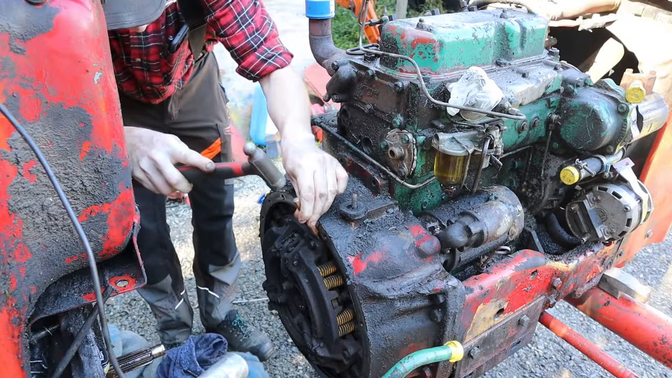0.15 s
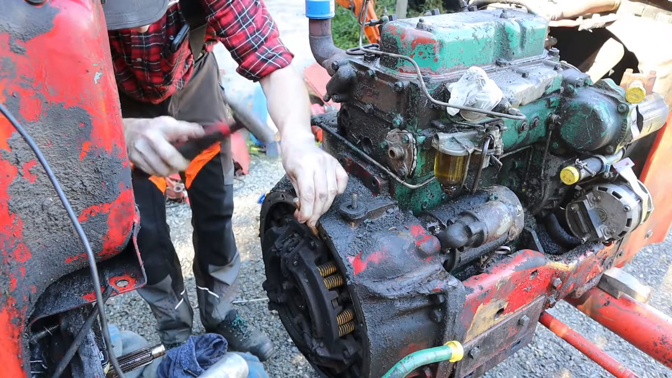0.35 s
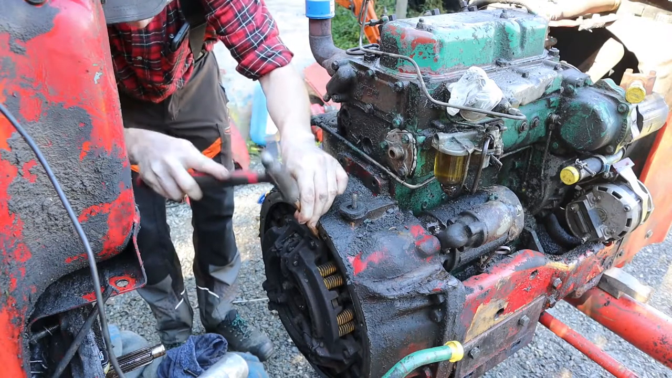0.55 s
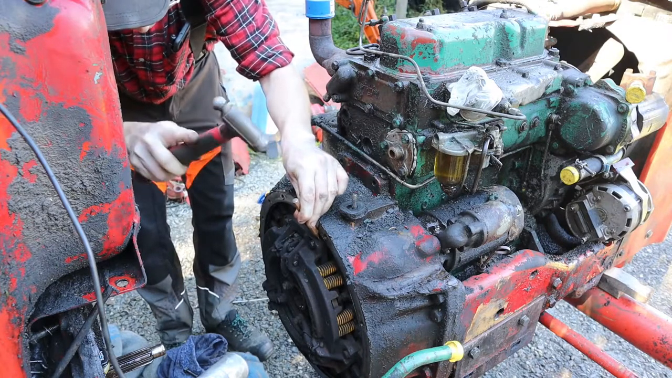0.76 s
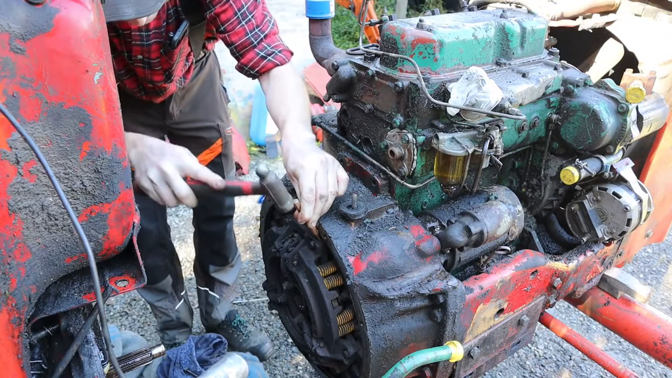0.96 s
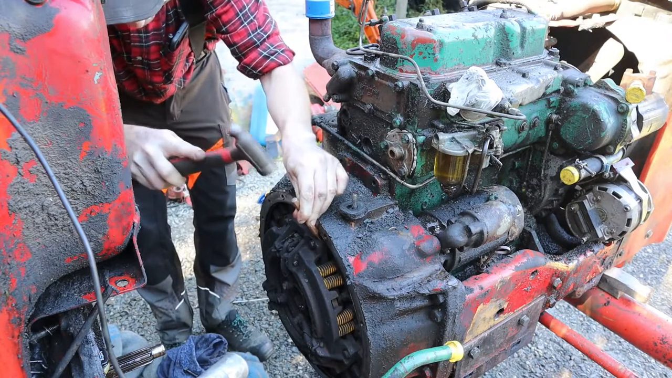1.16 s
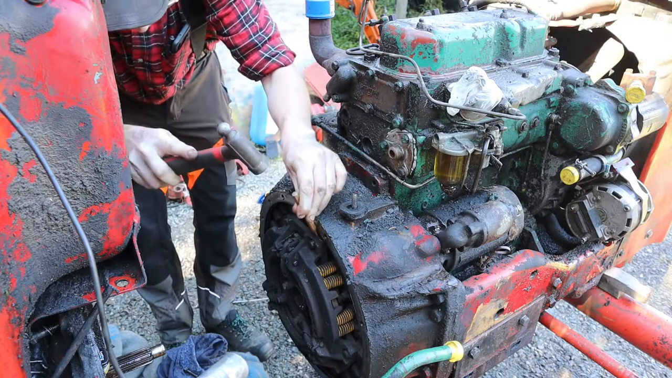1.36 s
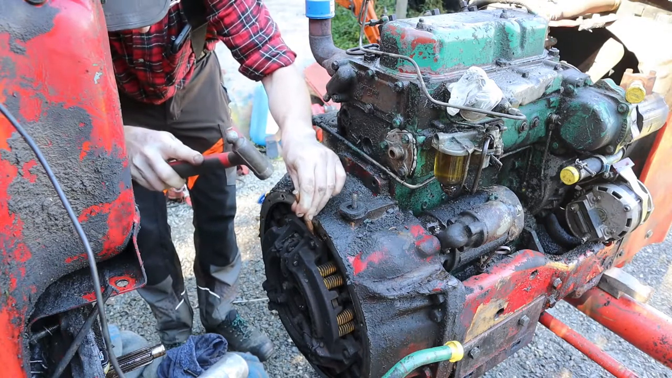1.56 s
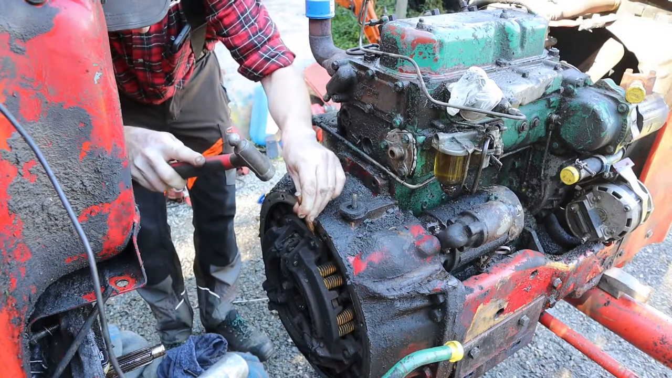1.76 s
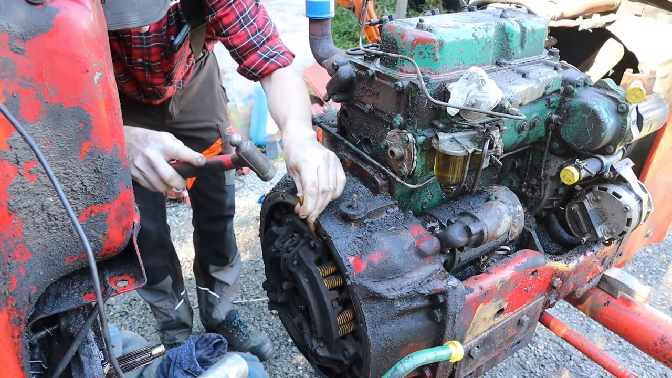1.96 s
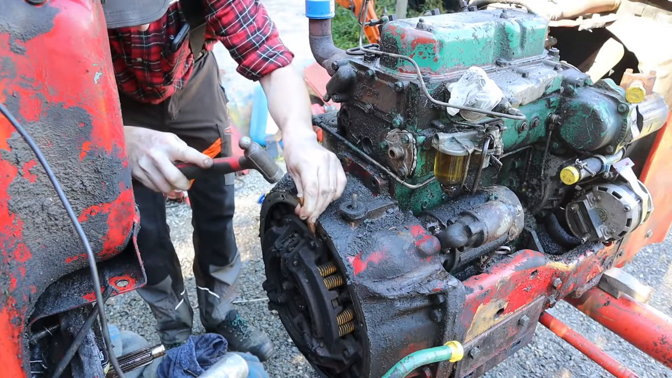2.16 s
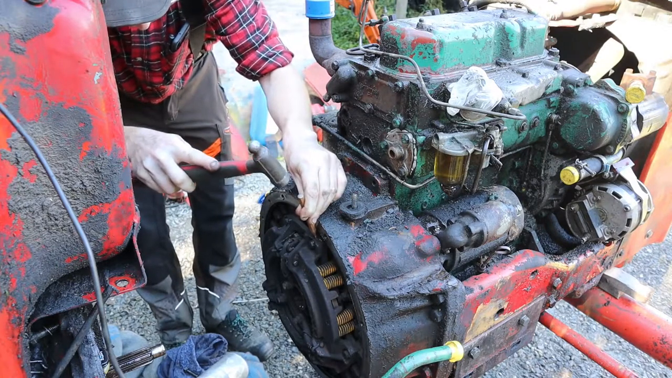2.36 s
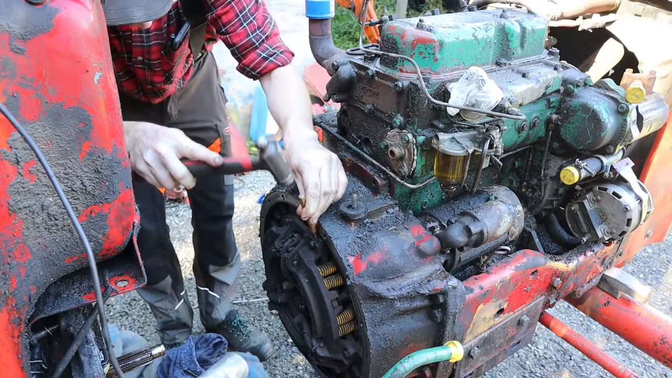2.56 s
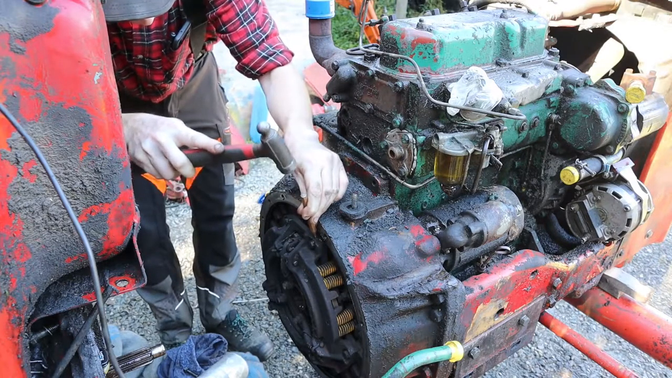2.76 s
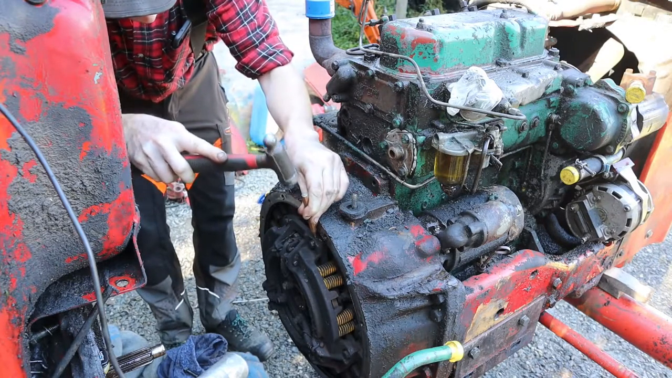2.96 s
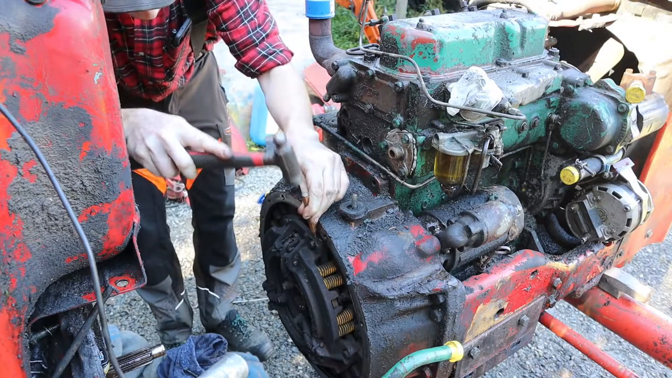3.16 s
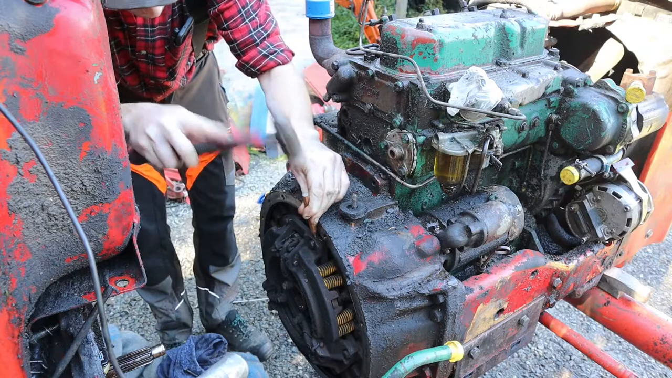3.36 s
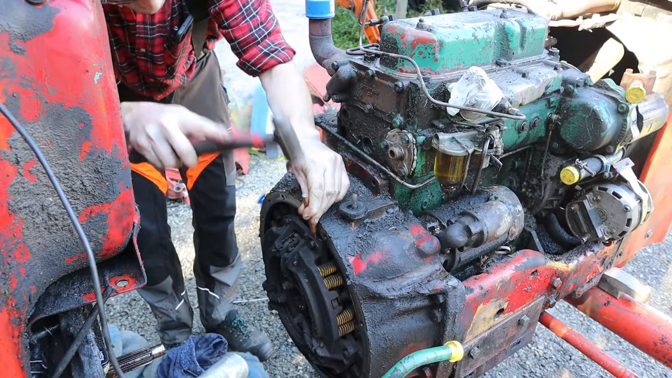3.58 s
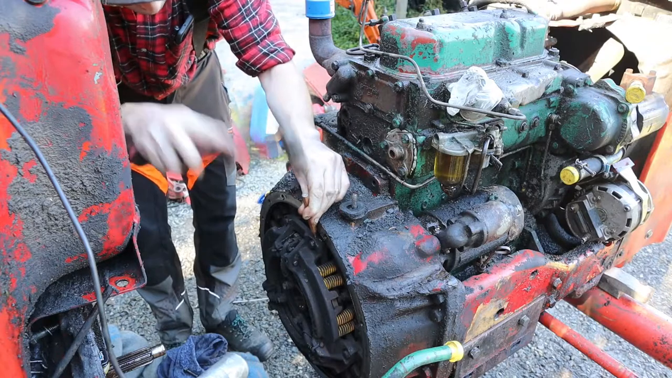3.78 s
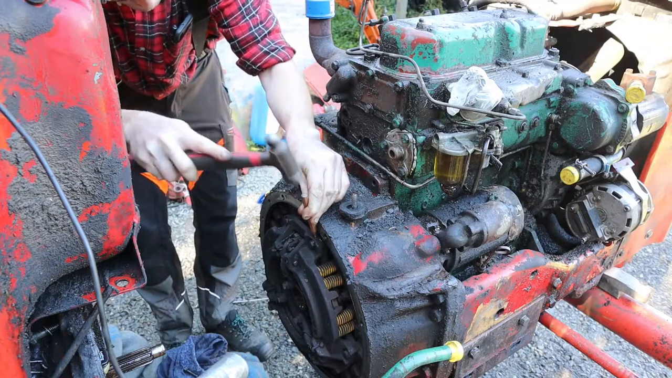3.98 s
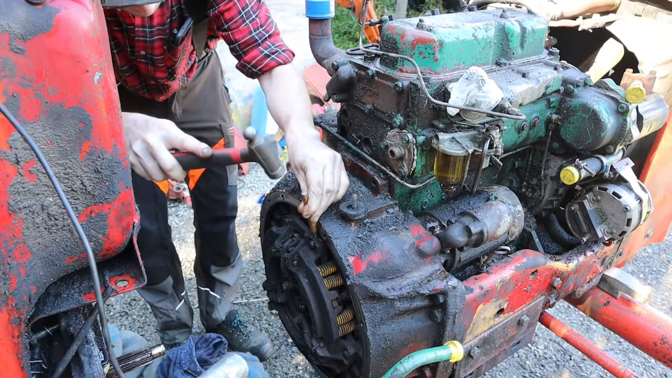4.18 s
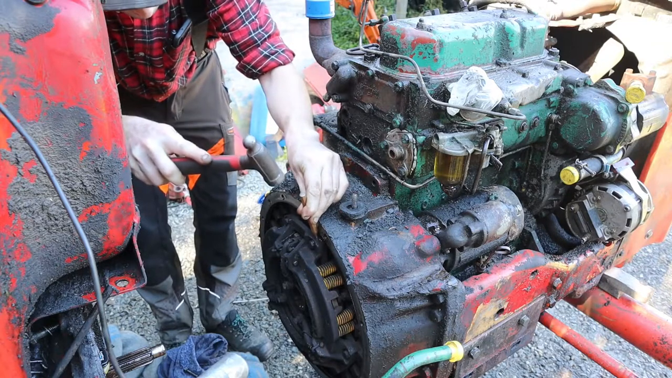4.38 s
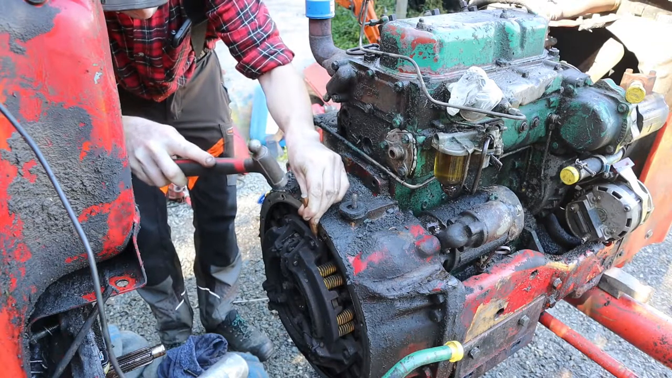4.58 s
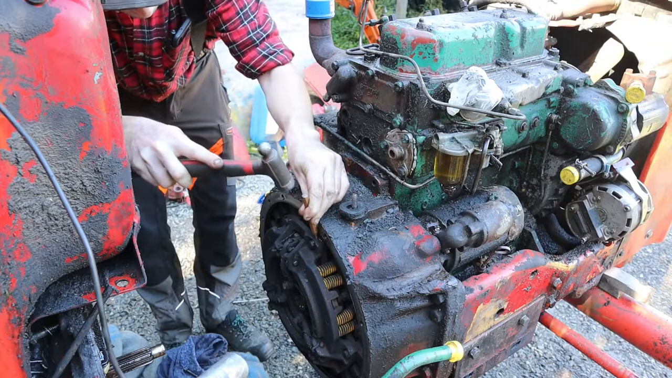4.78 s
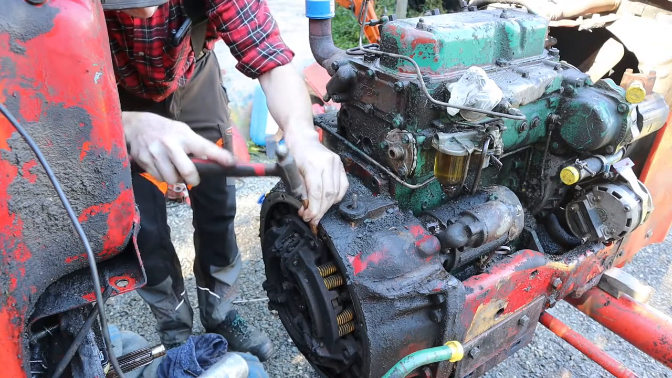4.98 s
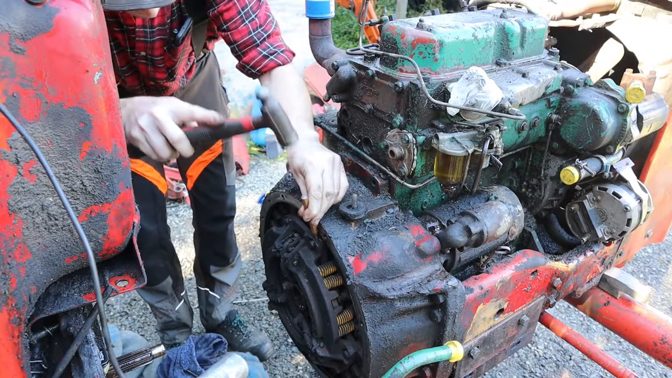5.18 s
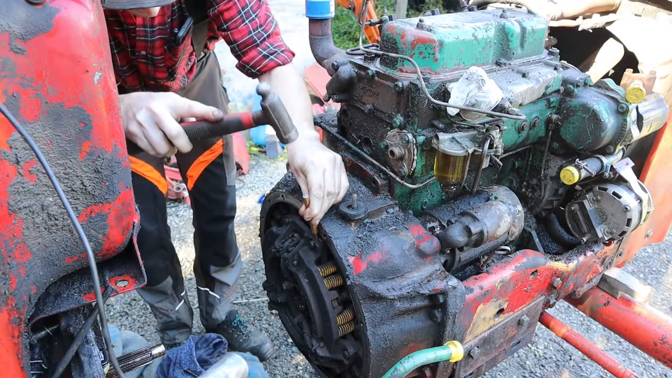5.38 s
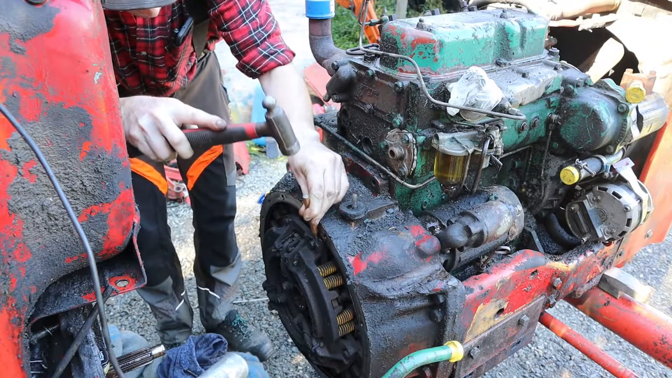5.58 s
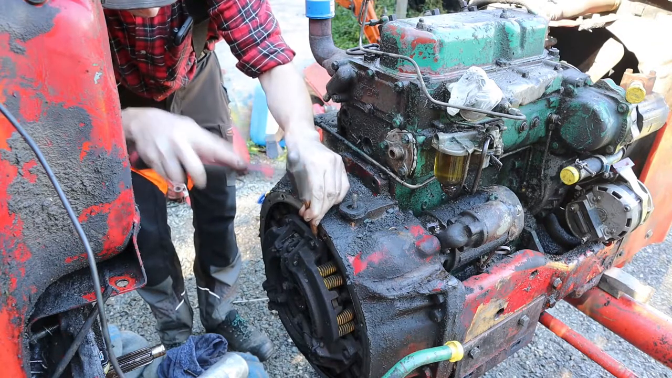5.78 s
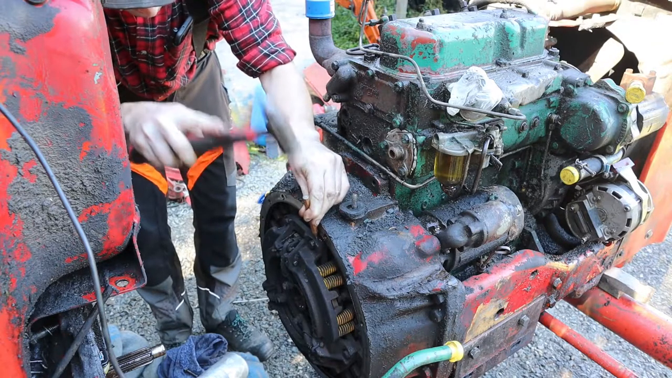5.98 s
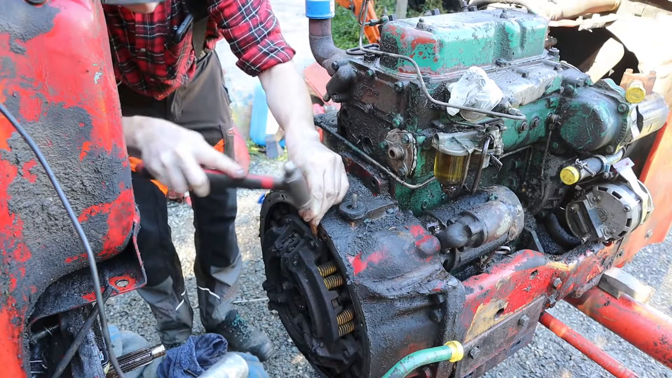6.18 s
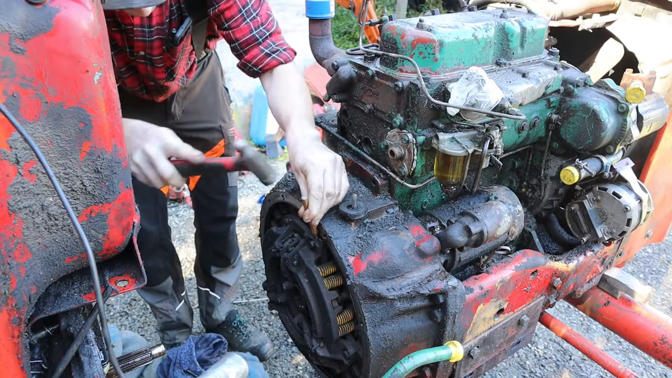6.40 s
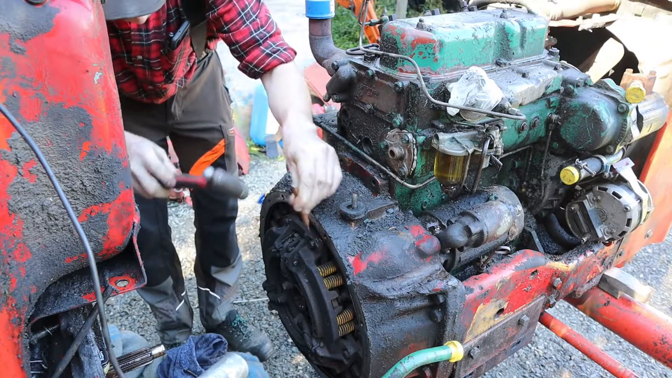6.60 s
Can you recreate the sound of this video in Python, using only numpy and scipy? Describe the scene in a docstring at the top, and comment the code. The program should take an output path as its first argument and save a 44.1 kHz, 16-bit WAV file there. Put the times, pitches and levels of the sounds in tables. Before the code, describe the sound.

An open yard, close microphone. Gentle low wind buffets at the start under a very soft hiss, a faint low wavering hum and blurred distant birdsong, with a tiny falling chirp at 0.3 s. At 0.5 s a hammer hits a steel punch on a cast engine housing: a loud, bright crack with a short, solid clank. A second blow at 1.0 s has a quick weak rebound. The wind then fades through a long pause, with faint short chirps around 1.9-2.2, 2.9 and 3.3 s and a dull far knock at 2.6 s. Another blow at 3.5 s with a slight rebound, then a stronger one at 3.9 s whose thin metallic ring throbs and lingers. A very light double touch comes at 5.0 s. The final pair lands at 5.9 s, with a rebound tick, and 6.2 s, ringing faintly to the end. A far wall returns a barely audible thin echo.

```python
"""An open yard in a fading breeze: wind buffets the microphone over a soft hiss, a hum and blurred birdsong; birds chirp.
A hammer drives a steel punch against a cast engine housing: two blows and a rebound. A dull knock comes from far off,
then another pair of blows with a rebound, a light double touch, and a last pair with a rebound.
Each blow is a noise crack plus decaying sines: punch, casting, bolted cover, flywheel and ring gear.
A far wall returns a faint, thin echo; wind, hiss and chatter are filtered noise, the chirps gliding sines."""
import sys
import numpy as np
from scipy import signal
from scipy.io import wavfile

SR = 44100
rng = np.random.default_rng(int(sys.argv[2]) if len(sys.argv) > 2 else 0)


def transcribe(signal):
    """Save signal, clipped to [-1, 1], as a 16-bit WAV file at the path in sys.argv[1]."""
    frames = np.atleast_2d(signal).T
    limited = np.clip(frames, -1, 1)
    pcm = np.round(limited * 32767).astype(np.int16)
    wavfile.write(sys.argv[1], SR, pcm)


N = 292824

# Contacts of hammer and punch: start_s, crack_db, weight_db_per_octave (below 2 kHz; positive counts as 0),
# contact_cutoff_hz, punch_db, casting_db, cover_db, flywheel_db, ring_gear_db
BLOWS = [(.5443, 0.5, -3, 14000, -13.5, -16.5, -25.5, -51, -68),
         (0.9792, 1, 1, 12000, -24, -17.5, -19.5, -44.5, -66.5),
         (.9970, -22, 0, 9200, -33.5, -31, -62, -59.5, -78),
         (3.5037, -2, 0, 15000, -10.5, -20.5, -25.5, -52, -60),
         (3.5209, -33.5, 0, 9160, -36, -44, -45.5, -68, -76),
         (3.8844, 3, 0, 15140, -17, -17.5, -24.5, -39.5, -57.5),
         (4.9728, -32.5, -4, 5460, -52.5, -52.5, -65.5, -71, -89.5),
         (4.9931, -29, -5.5, 5450, -53.5, -53.5, -64.5, -72.5, -87),
         (5.8658, -2, 0, 14180, -13, -17.5, -24.5, -56.5, -60.5),
         (5.898, -20, 0, 7000, -31, -41, -55, -64.5, -75),
         (6.2253, 3.5, 0, 12700, -17.5, -18, -23.5, -39.5, -60)]
(BLOW_S, CRACK_DB, WEIGHT_DB_PER_OCTAVE, CONTACT_CUTOFF_HZ,
 PUNCH_DB, CASTING_DB, COVER_DB, FLYWHEEL_DB, RING_GEAR_DB) = np.transpose(BLOWS)


def from_db(db):
    """Decibels to amplitude gain."""
    return 10 ** (np.asarray(db) / 20)


def rms_one(x):
    """Scale to unit power."""
    return x / np.sqrt(np.mean(x ** 2) + 1e-20)


def level_in_time(points):
    """Read a (time_s, level_db) curve at every sample."""
    time_s, level_db = np.transpose(points)
    return np.interp(np.arange(N) / SR, time_s, level_db)


def at_hz(points, hz, axis=1):
    """Read one column of a table on a log-frequency axis."""
    points = np.array(points)
    return np.interp(np.log(hz), np.log(points[:, 0]), points[:, axis])


def drift(rate_hz):
    """Slow random wandering with rms 1: low-passed noise, drawn every 40 samples."""
    pole = np.exp(-80 * np.pi * rate_hz / SR)
    steps = rng.standard_normal(N // 40 + 2002)
    slow = signal.lfilter([1], [1, -2 * pole, pole * pole], steps)[2000:]  # drop the filter's start
    return np.interp(np.arange(N) / 40, np.arange(len(slow)), rms_one(slow))


def band_pass(x, low_hz, high_hz):
    """Keep what lies between two frequencies."""
    return signal.sosfilt(signal.butter(2, [low_hz, high_hz], "band", fs=SR, output="sos"), x)


def high_pass(x, hz):
    """Roll off the bass below a frequency."""
    return signal.sosfilt(signal.butter(2, hz, "high", fs=SR, output="sos"), x)


def clicks(times_s, db):
    """One single-sample impulse per contact, scaled by its level."""
    train = np.full(N, 1e-18)  # tiny floor keeps the decays off zero
    train[np.round(np.asarray(times_s) * SR).astype(int)] = from_db(db)
    return train


def fade(train, t60_s):
    """Each click dies away exponentially, by 60 dB in t60_s."""
    return signal.lfilter([1], [1, -from_db(-60 / (t60_s * SR))], train)


def swell(x, seconds):
    """One-pole smoothing delays the build-up."""
    pole = np.exp(-1 / (seconds * SR))
    return signal.lfilter([1 - pole], [1, -pole], x)


def ring(train, hz, t60_s):
    """Two-pole resonance: a unit click starts a decaying sine of height 1."""
    pole, angle = from_db(-60 / (t60_s * SR)), 2 * np.pi * hz / SR
    return signal.lfilter([0, np.sin(angle)], [1, -2 * pole * np.cos(angle), pole * pole], train)


def t60_of_width(width_hz):
    """Decay time of a resonance with this bandwidth."""
    return np.log(1000) / (np.pi * width_hz)


def bands(lowest_hz, count):
    """Third-octave bands of white noise; neighbours are unrelated."""
    edges_hz = lowest_hz * 2 ** (np.arange(count + 1) / 3)
    white = rng.standard_normal((2, N))
    for k, (low_hz, high_hz) in enumerate(zip(edges_hz, edges_hz[1:])):
        yield np.sqrt(low_hz * high_hz), band_pass(white[k % 2], low_hz, high_hz)


def bed(spectrum, lowest_hz, count, patchy_db, rate_hz):
    """Coloured noise whose bands flicker, partly together; rms 1."""
    together = drift(rate_hz)
    total = np.zeros(N)
    for hz, noise in bands(lowest_hz, count):
        flicker_db = patchy_db * (together + drift(rate_hz))
        total += noise * from_db(at_hz(spectrum, hz) + flicker_db)
    return rms_one(total)


def contact_db(hz):
    """Colour of each blow: a longer contact leaves the treble unexcited, a lighter one the bass."""
    octaves_below_2k = max(np.log2(2000 / hz), 0)
    bass_db = np.minimum(WEIGHT_DB_PER_OCTAVE, 0) * octaves_below_2k
    treble_db = -10 * np.log10(1 + (hz / CONTACT_CUTOFF_HZ) ** 14)
    return bass_db + treble_db


def struck(modes, blow_db, spread_db, flip=-1):
    """Every blow excites every mode, with chance in strength; flip=-1 alternates the starting sense."""
    luck = rng.standard_normal((len(BLOWS), len(modes)))
    total = np.zeros(N)
    for k, (hz, db, t60_s) in enumerate(modes):
        train = clicks(BLOW_S, blow_db + db + spread_db * luck[:, k])
        total += ring(train * flip ** k, hz, t60_s)
    return total


def struck_short(modes, blow_db, spread_db):
    """Damped modes follow the colour of the contact; neighbours start in opposite sense."""
    total = np.zeros(N)
    for k, (hz, db, t60_s) in enumerate(modes):
        total += struck([(hz, db, t60_s)], blow_db + contact_db(hz), spread_db) * (-1) ** k
    return total


def haze(low_hz, high_hz, db, t60_s, blow_db):
    """Modes too many to tell apart merge into a dying band of noise."""
    noise = band_pass(rng.standard_normal(N), low_hz, high_hz)
    return rms_one(noise) * fade(clicks(BLOW_S, blow_db + db), t60_s)


def snap():
    """The first instant of steel on steel: a bright noise burst of a few milliseconds."""
    bright = band_pass(rng.standard_normal(N), 4000, 14000)
    train = clicks(BLOW_S, CRACK_DB - 11 + contact_db(8000))
    return bright * fade(train, t60_s=0.0096)


def crack():
    """Countless short modes of the struck steel: noise that swells and dies at its own pace in each band."""
    # Colour of the crack: band_hz, level_db (noise density)
    crack_colour = [(59, -58), (100, -35), (676, -6.5), (970, -21), (1480, -2.5), (1830, -18), (2170, -5.5),
                    (2580, -6.5), (3320, -0.5), (4670, -8.5), (5530, -3.5), (9820, -8.5), (12700, -12.5),
                    (16000, -25.5)]
    # Quick decay in the struck steel: band_hz, t60_s
    quick_decay = [(150, 0.25), (600, 0.065), (2000, 0.059), (4000, 0.043), (8000, .03), (15000, 0.0092)]
    # Time constant of the build-up: band_hz, build_up_s
    build_up = [(300, 0.003), (2000, 0.0023), (6000, 0.00064), (15000, 0.00017)]
    # Slower tail scattered by the yard: band_hz, level_db (relative to the quick part), t60_s
    yard_tail = [(150, -23.5, 1), (600, -23.5, 0.63), (1980, -26.5, 0.13), (2700, -42, .5),
                 (3500, -39, 0.59), (4500, -44, .5), (8000, -34, .22), (15000, -36.5, .15)]
    total = np.zeros(N)
    for hz, noise in bands(98.2, count=22):
        train = clicks(BLOW_S, CRACK_DB + contact_db(hz) + at_hz(crack_colour, hz))
        quick = fade(train, at_hz(quick_decay, hz))
        slow = from_db(at_hz(yard_tail, hz)) * fade(train, at_hz(yard_tail, hz, axis=2))
        # bending waves take time to fill the casting
        total += noise * swell(quick + slow, at_hz(build_up, hz))
    return total


def punch():
    """Punch and hammer head ring in short, bright modes."""
    # Short modes of the steel: mode_hz, level_db, t60_s
    punch_modes = [(3990, -6.5, 0.013), (4278, -4.5, 0.024), (5180, -1.5, 0.026), (5805, 0, 0.015),
                   (6500, -3, 0.012), (7080, -2.5, 0.037), (7790, -10, .025), (11340, -8.5, .02),
                   (12600, -6, 0.024)]
    return struck_short(punch_modes, PUNCH_DB, spread_db=1.5)


def casting():
    """The heavy housing thuds in damped modes."""
    # Damped modes of the casting: mode_hz, level_db, t60_s
    casting_modes = [(80, -30, .15), (135, -28, .2), (258, -24, .25), (312, -17, .1), (395, -4, .045),
                     (441, -9, .06), (861, -22, .12), (1164, -12, .08), (1868, -14, .085), (2170, -2, .05),
                     (2260, -2, .06), (2530, -14, .06), (2830, -8, .05), (3020, -5, .045), (3140, -3, .05),
                     (3385, -3, .05), (3620, -8, .05)]
    return struck_short(casting_modes, CASTING_DB, spread_db=3.0)


def cover():
    """A cover on the casting, driven through its bolts: each mode rises before it fades."""
    # Modes of the bolted cover: mode_hz, level_db, t60_s
    cover_modes = [(517, -13, .26), (733, 0, .21)]
    swell_s = .008  # time constant of the shaking that drives it
    total = np.zeros(N)
    for hz, db, t60_s in cover_modes:
        shaking = ring(clicks(BLOW_S, COVER_DB + db), hz, np.log(1000) * swell_s)
        total += ring(shaking, hz, t60_s) * 2 / (swell_s * SR)  # offsets the gain of the second resonance
    return total


def flywheel():
    """Long modes in close pairs beat against each other, with a few damped ones and a faint haze."""
    # Modes of the flywheel: mode_hz, level_db, t60_s
    flywheel_modes = [(738, -33, 2.0), (1167, -28, 2.0), (1178, -26, 2.0), (1319, -24, 2.0),
                      (1347, -21, 1.0), (1360, -21, 1.3), (1392, -21, 1.3), (1500, -21, 2.0),
                      (1529.6, -3, 1.45), (1552.3, -2, 1.6), (1571.4, -8, 1.5), (1591, -18, 2.0),
                      (1631, -27, 1.3), (1660, -14, 1.9), (1670, -23, 2.0), (1759, -26, 2.0),
                      (1778, -20, 2.3), (1787, -20, 1.3), (1800, -26, 2.5), (1894, -21, 2.4),
                      (1907, -21, 2.0), (1930, -29, 1.3), (2061, -28, 3.0), (1434, 14, .14),
                      (1495, 20, .04)]
    lines = struck(flywheel_modes, FLYWHEEL_DB, spread_db=2.0, flip=1)
    return lines + haze(1001.5, 2201, db=-21.5, t60_s=2.08, blow_db=FLYWHEEL_DB)


def flywheel_rim():
    """Two close modes start in opposite sense, so the ring blooms and throbs."""
    # Modes at the rim: mode_hz, level_db, t60_s
    rim_modes = [(1527.4, 11, .45), (1558.5, 11, .42)]
    return struck(rim_modes, FLYWHEEL_DB, spread_db=1.0)


def ring_gear():
    """Long modes of the ring gear over a shorter haze of crowded ones."""
    # Modes of the ring gear: mode_hz, level_db, t60_s
    gear_modes = [(218, -4, 1.1), (367, -2, 2.2), (1032, -3, 1.3), (1041, -3, 1.0), (1057, -6, 1.5),
                  (1132, -16, 1.6), (2088, -8, 1.5), (2099, -13, 2.0), (2108, -14, 1.8), (2152, -12, 1.0),
                  (2178, 1, 1.1), (2194, -2, 1.4), (2259, -17, 1.8), (2329, -6, 1.3), (2394, -4, 1.8),
                  (2412, -18, 1.8), (2426, -18, 1.8)]
    lines = struck(gear_modes, RING_GEAR_DB, spread_db=2.0)
    return lines + haze(1949.5, 2499.5, db=-7, t60_s=0.5, blow_db=RING_GEAR_DB)


def hammer_blows():
    """All the struck parts together, without the deepest bass."""
    blows = snap() + crack() + punch() + casting() + cover()
    blows += flywheel() + flywheel_rim() + ring_gear()
    return high_pass(blows, 70)  # steel this size radiates little below


def wall_echo(x):
    """One late, thin reflection from a far wall, smeared by its uneven surface."""
    delay_s, echo_db, smear_t60_s = .194, -46.5, .035
    thin = band_pass(x, 3300, 5000)
    t = np.arange(round(smear_t60_s * SR)) / SR
    smear = rng.standard_normal(len(t)) * from_db(-60 * t / smear_t60_s)
    smeared = signal.fftconvolve(thin, smear / np.linalg.norm(smear))
    return from_db(echo_db) * np.r_[np.zeros(round(delay_s * SR)), smeared][:N]


def wind():
    """Low rumble of a fading breeze at the microphone: flickering noise with a few stronger thumps."""
    # Level of the breeze: time_s, level_db
    breeze = [(0, -56), (.45, -60), (1.5, -63.5), (2.4, -74.5), (3.4, -80.5), (4.2, -90), (5.6, -92),
              (6.64, -84)]
    # Colour of the rumble: band_hz, level_db (relative noise density)
    rumble_colour = [(12, -35), (20, -1.5), (64, 3.5), (163, -17), (231, -34), (259, -32), (300, -35),
                     (390, -65), (660, -120)]
    # Single thumps of air on the microphone: centre_s, level_db
    buffets = [(.76, -48), (1.62, -58), (2.07, -59.5), (2.24, -58), (2.55, -75), (3.01, -73), (3.14, -66.5),
               (3.41, -72)]
    half_width_s = .03  # of a thump
    t = np.arange(N) / SR
    power = from_db(level_in_time(breeze)) ** 2
    for centre_s, db in buffets:
        power += from_db(db) ** 2 * np.exp(-((t - centre_s) / half_width_s) ** 2)
    return np.sqrt(power) * bed(rumble_colour, 20, count=11, patchy_db=3.0, rate_hz=9.0)


def birds():
    """Short whistles slide faster at first; each swells and fades, with fluttering level and blurred pitch."""
    # Chirps: start_s, length_s, from_hz, to_hz, level_db
    chirps = [(.26, 0.074, 6350, 4800, -82), (1.855, .03, 3540, 4900, -80), (2.005, .03, 3094, 4600, -78),
              (2.208, .03, 3300, 4650, -78), (2.923, .065, 6990, 4860, -70), (3.30, .033, 3400, 4900, -76)]
    flutter = from_db(4.0 * drift(40.0))
    blur_hz = 120 * drift(80.0)
    total = np.zeros(N)
    for start_s, length_s, from_hz, to_hz, db in chirps:
        done = np.clip((np.arange(N) / SR - start_s) / length_s, 0, 1)
        hz = from_hz + (to_hz - from_hz) * done ** .7 + blur_hz
        whistle = np.sin(2 * np.pi * np.cumsum(hz) / SR)
        total += np.sqrt(2) * from_db(db) * np.sin(np.pi * done) * whistle
    return total * flutter


def far_knock():
    """A dull knock far off: a short puff of low-mid noise."""
    # Knocks: start_s, level_db (at the onset)
    knocks = [(2.599, -66)]
    start_s, db = np.transpose(knocks)
    dull = band_pass(rng.standard_normal(N), 450, 950)
    return rms_one(dull) * fade(clicks(start_s, db), t60_s=0.26)


def chatter():
    """Distant birdsong blurred into a band: flickering noise, twice through a broad resonance."""
    centre_hz, t60_s = 3350, t60_of_width(1000)
    band = ring(ring(rng.standard_normal(N), centre_hz, t60_s), centre_hz, t60_s)
    return from_db(-77 + 2 * drift(15.0)) * rms_one(band)


def hum():
    """Noise through one narrow resonance: a low tone that wavers, comes and goes."""
    # Level of the tone: time_s, level_db
    hum_level = [(0, -74), (.5, -72.5), (2.4, -78), (2.8, -85.5), (5.0, -79), (5.2, -71), (5.8, -78),
                 (6.64, -75.5)]
    tone = ring(rng.standard_normal(N), 372.6, t60_of_width(6.1))
    return from_db(level_in_time(hum_level)) * rms_one(tone)


def steady_hiss():
    """A soft hiss: nearly steady coloured noise."""
    # Colour of the hiss: band_hz, level_db (relative noise density)
    hiss_colour = [(40, -4.5), (80, -3), (140, -6.5), (230, -4), (300, -9), (700, -9.5), (1200, -16.5),
                   (2000, -18), (3400, -18), (5000, -19), (7000, -22.5), (14000, -26), (16000, -26)]
    return from_db(-70.5) * bed(hiss_colour, 40, count=26, patchy_db=.3, rate_hz=6.0)


def scene():
    """Blows with their echo over wind, hiss and small yard sounds."""
    blows = hammer_blows()
    small_sounds = birds() + far_knock() + chatter() + hum()
    mix = blows + wall_echo(blows) + wind() + small_sounds + steady_hiss()
    return mix[None]  # one channel


def record(dry):
    """The loudest peaks are rounded, the deepest bass rolls off, the top is cut."""
    rounded = 1.5 * np.tanh(dry / 1.5)
    x = high_pass(rounded, 30)
    # 50 dB down from 16.6 kHz upward
    return signal.sosfilt(signal.cheby2(12, 50, 16600, fs=SR, output="sos"), x)


dry = scene()
out = record(dry)
transcribe(out)
```